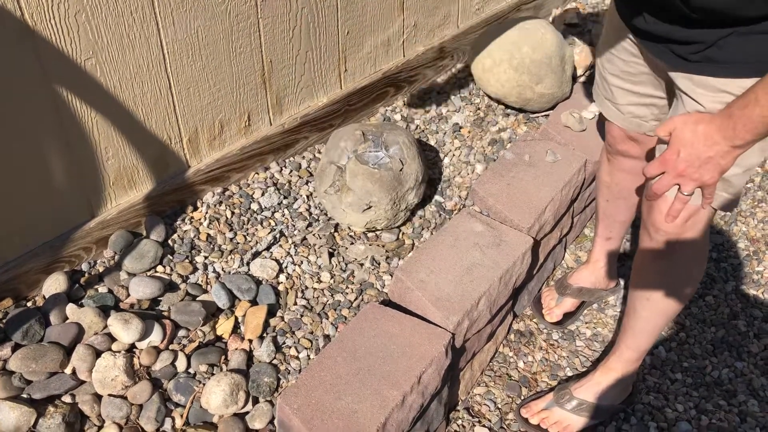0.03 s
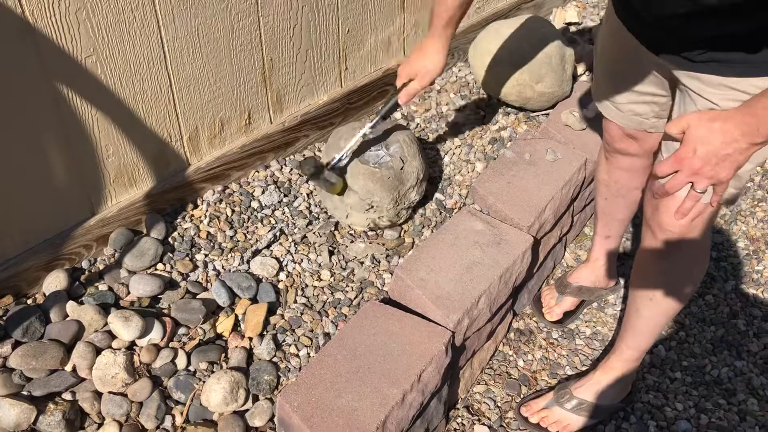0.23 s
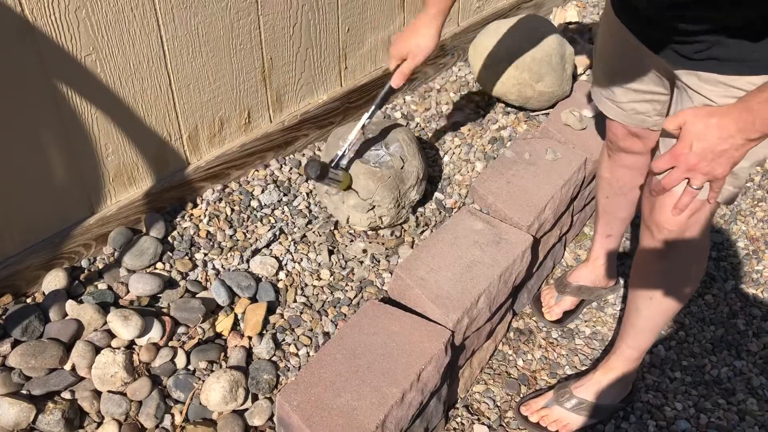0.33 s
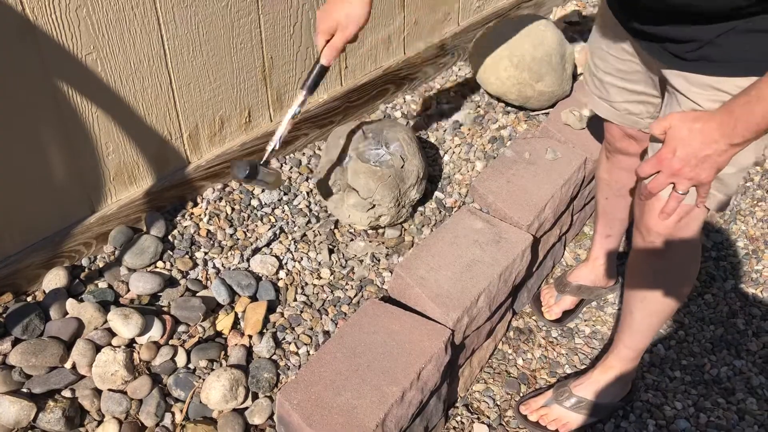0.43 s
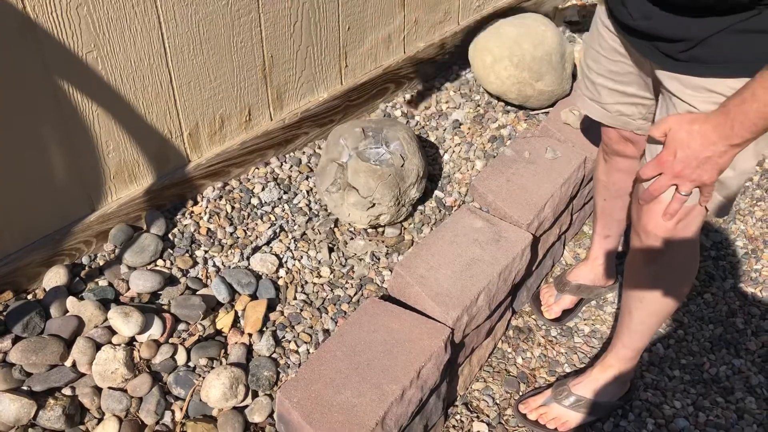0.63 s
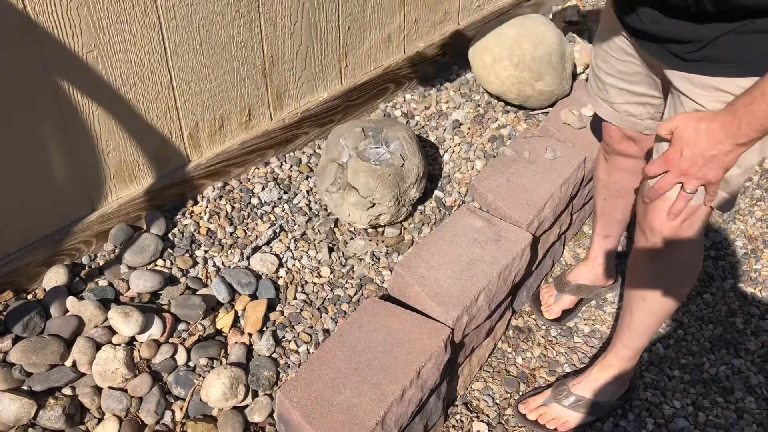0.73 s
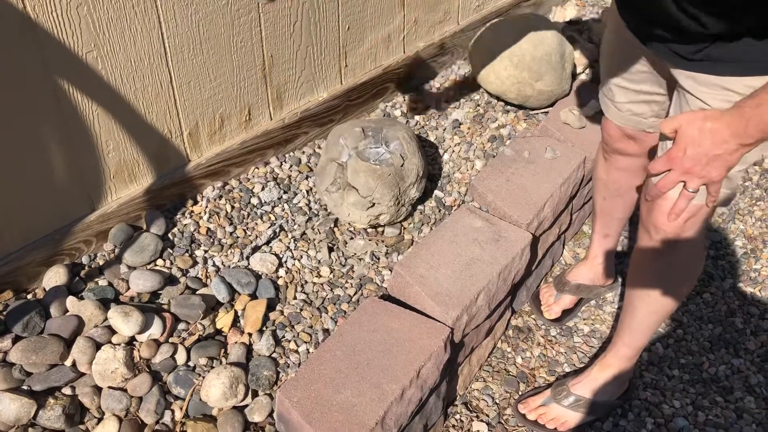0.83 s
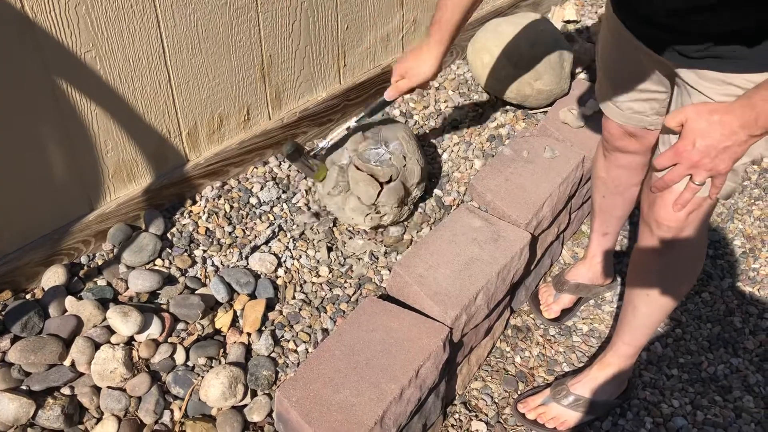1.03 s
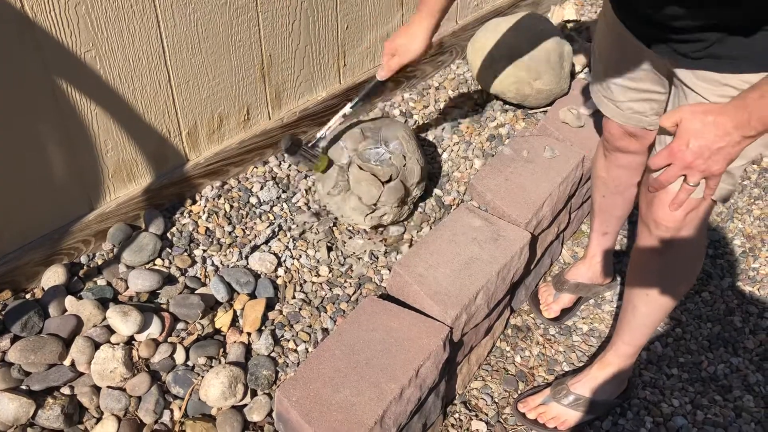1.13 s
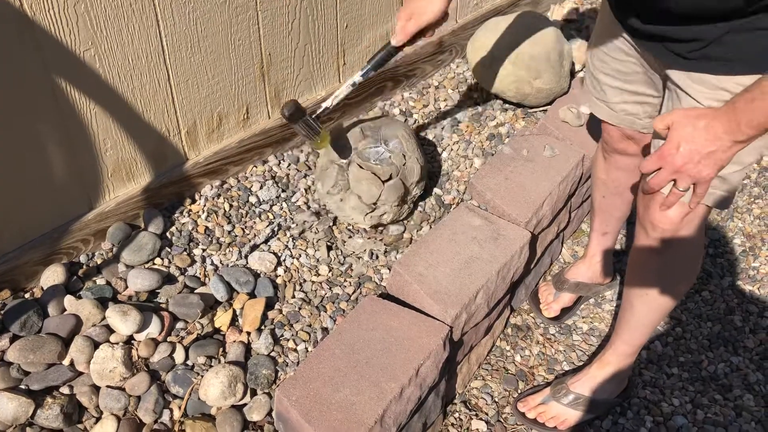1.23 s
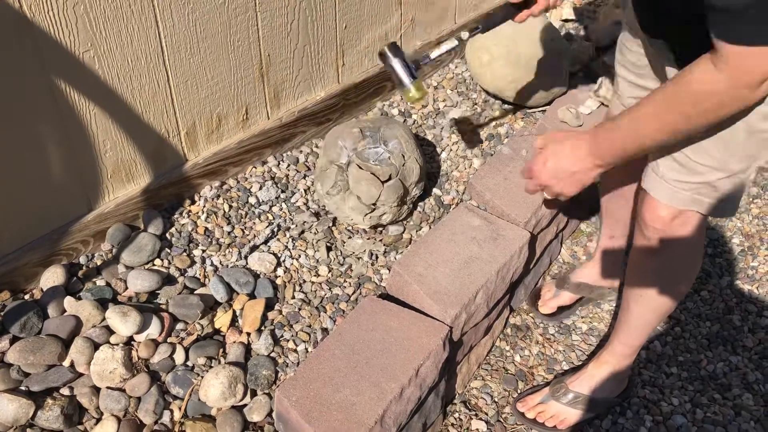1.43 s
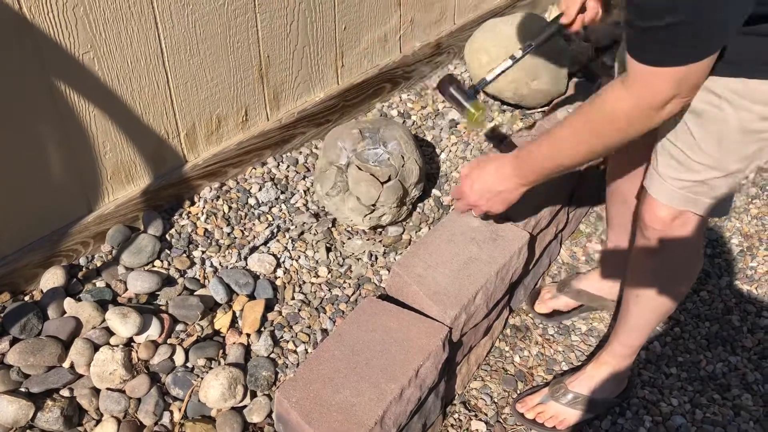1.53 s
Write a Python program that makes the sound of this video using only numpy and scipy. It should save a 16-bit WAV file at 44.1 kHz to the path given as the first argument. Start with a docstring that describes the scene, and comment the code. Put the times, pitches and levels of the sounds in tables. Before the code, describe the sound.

A hammer strikes a rock at about 0.2 seconds, a sharp crack with a brief stony ring, a dull thud and a short outdoor echo. Chips click onto gravel until 0.6 seconds. A second, slightly softer blow lands at about 0.95 seconds, spraying grit and small ticking fragments. From around 1.4 seconds a foot scrapes softly on the gravel. Quiet outdoor air lies underneath.

```python
"""Hammer on rock

A hammer strikes a rock twice in a gravel bed beside a wall. Each blow cracks, rings the stone briefly
and drives it into the ground with a thud; the yard answers and chips patter down. At the end a foot
shifts on the gravel. Quiet outdoor air lies underneath, with soft low bumps and faint tones."""
import sys
import numpy as np
from scipy import signal
from scipy.fft import rfft, irfft
from scipy.io import wavfile
from scipy.ndimage import uniform_filter1d

SR = 44100
rng = np.random.default_rng(int(sys.argv[2]) if len(sys.argv) > 2 else 0)


def dump(signal):
    """Clip the signal to [-1, 1] and save it as 16-bit WAV at the path in sys.argv[1]."""
    limited = np.clip(np.atleast_2d(signal).T, -1, 1)
    pcm = np.round(limited * 32767).astype(np.int16)
    wavfile.write(sys.argv[1], SR, pcm)


N = 70560
T = np.arange(N) / SR
HZ = np.fft.rfftfreq(N, 1 / SR)
SHORT = 4096  # samples in a brief event
GRIT_HZ, YARD_RISE_S = 8000, 0.0042


def amp(db):
    """Decibels to gain."""
    return 10 ** (np.asarray(db) / 20)


def unit(x):
    """Scale to rms 1."""
    return x / np.sqrt(np.mean(x ** 2) + 1e-20)


def noise(gain):
    """Noise of rms 1 with the given gain at each frequency."""
    return unit(irfft(gain * (rng.standard_normal(len(gain)) + 1j * rng.standard_normal(len(gain)))))


def colour(points):
    """An EQ curve through (Hz, dB) points on a log frequency axis."""
    hz, db = np.transpose(points)
    return amp(np.interp(np.log(HZ + 1), np.log(hz), db))


def band(hz, octaves, size=N):
    """The EQ curve of a broad resonance."""
    octaves_away = np.log2((np.fft.rfftfreq(size, 1 / SR) + 1) / hz)
    return 1 / (1 + (octaves_away / octaves) ** 2) ** 1.5


def fade(rise_s, t60_s, size=N):
    """Quick attack, exponential decay."""
    return (1 - np.exp(-T[:size] / rise_s)) * np.exp(-np.log(1000) * T[:size] / t60_s)


def at(s, x):
    """Place x at s seconds in a full-length track."""
    return np.pad(x, (max(round(s * SR), 0), N - len(x)))[:N]


def swell(s, db, hz, width_s, glide=0):
    """A slightly wavering tone that swells and fades in a bell curve around s."""
    t = T - s
    knots = T[::SR // 100]
    waver = 0.7 * np.sqrt(hz / 2000) * np.interp(T, knots, rng.standard_normal(len(knots)))
    envelope = np.exp(-np.minimum((t / width_s) ** 2, 60) / 2)
    return amp(db) * envelope * np.cos(2 * np.pi * (hz * t + glide * t ** 2 / 2) + waver)


def background():
    """Quiet outdoor air with soft low bumps and a few faint tones."""
    # The air's dark colour. Each row: frequency in Hz, level in dB.
    air_eq = [(15, -36), (25, -5), (66, -3.5), (122, -4), (227, -3.5), (313, -10.5), (349, -15),
              (495, -14.5), (648, -19), (997, -19), (1240, -21), (1380, -21), (1620, -25), (1850, -23),
              (2170, -27), (2770, -22.5), (3000, -23), (3630, -21.5), (4150, -26.5), (6210, -23.5),
              (7300, -28.5), (11200, -37), (15500, -38.5)]
    # The air's slow rise. Each row: time in seconds, level in dB.
    air_levels = [(0, -62), (.5, -60.5), (.8, -59.5), (1.15, -57), (1.27, -58.5), (1.6, -56)]
    # Low bumps. Each row: peak time in seconds, level in dB, pitch in Hz, half length in seconds.
    bumps = [(0.09, -50.5, 80, 0.0043), (0.387, -48.5, 62, 0.028), (0.759, -46.5, 72.4, 0.0052),
             (.862, -45, 106, 0.0097), (1.208, -51, 72.5, 0.013), (1.303, -40, 60, 0.0089),
             (1.388, -55, 99, 0.0081), (1.493, -50.5, 77.4, 0.025)]
    # Faint tones. Each row: as for a bump, then glide in Hz per second.
    tones = [(1.19, -63, 5110, .08, 100), (.65, -58, 235, .02, 0), (1.16, -55, 240, .03, 0),
             (1.348, -52, 280, .02, 1500), (.75, -76, 5100, .3, 0), (1.365, -68, 2310, .035, 500),
             (1.37, -69, 1490, .03, 1000)]
    air = amp(np.interp(T, *np.transpose(air_levels))) * noise(colour(air_eq))
    return air + sum(swell(*bump) for bump in bumps) + sum(swell(*tone) for tone in tones)


def chips():
    """Each fragment clicks on the gravel and leaves a faint tail in the yard."""
    # Chips and pebbles landing. Each row: start in seconds, level in dB, pitch in Hz,
    # width in octaves, t60 in seconds.
    landings = [(0.214, -30.5, 2780, 0.78, 0.0027), (0.3086, -20.5, 2080, 0.4, .016),
                (.3080, -29, 4500, 0.72, 0.016), (0.351, -33, 7050, 0.73, 0.012),
                (0.3533, -25.5, 5100, 0.86, 0.0067), (.3742, -36, 12000, 0.65, .008),
                (0.3768, -29.5, 8700, 0.75, 0.013), (0.3854, -28.5, 11000, 1.4, 0.009),
                (0.403, -39, 9500, 1.9, 0.014), (0.4123, -37, 12000, 0.59, 0.0095),
                (.4335, -45.5, 4930, 1.5, 0.011), (0.438, -34.5, 8200, 3, 0.0089),
                (.4675, -48, 10000, 1.3, 0.0071), (.5655, -33, 11100, 1.75, 0.01),
                (0.608, -57, 11000, 0.86, 0.0092), (0.905, -51, 4900, 1.3, 0.013),
                (1.0064, -29, 10600, 0.61, 0.0094), (1.0261, -24, 8240, 0.93, 0.0056),
                (1.0363, -26.5, 10200, 0.28, 0.0062), (1.045, -35, 5000, 1.8, 0.031),
                (1.0500, -34, 5000, 0.82, 0.02), (1.0514, -34, 1190, 0.53, 0.026),
                (1.1541, -39.5, 8860, 1.5, 0.014), (1.271, -53, 906, 0.73, 0.018),
                (1.415, -44.5, 6000, 1.3, 0.043), (1.435, -39, 6900, 1, 0.032),
                (1.4395, -38.5, 7000, .9, 0.075), (1.4350, -74, 810, .5, 0.06),
                (1.4833, -40, 6200, 1.5, 0.016), (1.5593, -30, 11300, 1.1, 0.013)]
    tail = amp(-24) * fade(YARD_RISE_S, t60_s=0.092, size=SHORT)
    out = np.zeros(N)
    for s, db, hz, octaves, t60_s in landings:
        click = fade(0.00048, t60_s, SHORT)
        out += at(s, amp(db) * (click + tail) * noise(band(hz, octaves, SHORT)))
    return out


def snap(gain):
    """Steel meets stone in one sharp pulse, treble first: the lows take longer to build."""
    build_cycles, lag_s = 1.4, 0.0002
    turns = build_cycles * np.log(HZ + 1) + lag_s * HZ
    pulse = irfft(gain * np.exp(-2j * np.pi * turns))[:SHORT]
    return at(0, pulse / np.abs(signal.hilbert(pulse)).max())


def ring(modes, rise_s):
    """Damped modes of alternating polarity, their balance a little different at every blow."""
    out = np.zeros(SHORT)
    for k, (hz, db, t60_s) in enumerate(modes):
        gain = (-1) ** k * amp(db + rng.normal(0, 1))
        out += gain * fade(rise_s, t60_s, SHORT) * np.sin(2 * np.pi * hz * T[:SHORT])
    return at(0, out)


def grains(per_s, hz):
    """Loose grit: sparse tiny ticks of uneven size, rms 1."""
    impacts = (rng.random(N) < per_s / SR) * rng.standard_normal(N)
    tick = noise(band(hz, octaves=0.78, size=SHORT)) * fade(0.0001, t60_s=0.0035, size=SHORT)
    return unit(signal.oaconvolve(impacts, tick)[:N])


def hammer():
    """The struck rock cracks, rings and thuds into the gravel; the yard answers and grit sprays."""
    # The blows. Each row: start in seconds, snap level in dB, snap pitch in Hz, crack, ring and knock
    # levels in dB, thud delay in seconds, then thud, ground, yard and grit levels in dB.
    blows = [(0.2359, -1.5, 3554, -12, -24, -18, .0108, -16, -31.5, -35.5, -54.5),
             (0.9455, -4, 2980, -17.5, -24, -21, .0112, -20, -38.5, -33, -32.5)]
    # Colour of the contact, one curve per blow. Each point: frequency in Hz, level in dB.
    contact_eqs = [
        [(250, -6), (600, -3), (1000, 1.5), (1800, -7), (2500, 1), (4100, -2.5), (5000, -7), (6300, -10),
         (10000, -12), (15500, -21)],
        [(250, -36), (600, 4.5), (1000, 0), (1400, -9), (2200, -2), (3200, -1), (4300, -12.5), (6000, -1.5),
         (9000, -5.5), (15500, -11)],
    ]
    # The rock's bright ring. Each row: pitch in Hz, relative level in dB, t60 in seconds.
    rock_modes = [(1488, -3, 0.027), (1899, -6.5, 0.053), (2135, -1, .05), (2428, -8, 0.065),
                  (2740, -3, 0.034), (2944, -17, 0.028), (3105, -4.5, .05), (3357, -8, 0.066),
                  (4060, -5, 0.0204), (4400, -9, 0.053), (5250, -13.5, .04), (6140, -4, .05),
                  (7050, -9.5, 0.042)]
    # Dull knock of the hammer head and the rock's bulk. Rows as for the ring.
    knock_modes = [(525, 4.5, 0.015), (662, 6.5, 0.018), (796, 3, 0.025), (1076, 1, 0.0088)]
    # The rock bedding into the ground. Rows as for the ring.
    thud_modes = [(85, -12, 0.13), (169, 1.5, 0.027), (293, 0, 0.017), (502, -3, 0.015), (702, 1.5, .028)]
    # The ground's rumble. Each row: frequency in Hz, level in dB.
    ground_eq = [(25, -28), (55, -11.5), (80, 0.5), (110, -7), (165, 0.5), (240, -9), (400, -16.5),
                 (900, -50)]
    # Colour of the yard's reverb and the crushed gravel. Each row: frequency in Hz, level in dB.
    yard_eq = [(120, -41.5), (200, -11), (515, -3), (974, -6), (1280, -8.5), (2560, -12.5), (3010, -11.5),
               (3300, -12.5), (7620, -17.5), (11000, -22), (15500, -26.5)]
    # The rock's modes linger in the reverb as peaks of 35 Hz half width.
    lingering = 1 + amp(-8.5) * sum(1 / (1 + ((HZ - hz) / 35) ** 2) for hz, _, _ in rock_modes)
    late_damping = np.exp(-np.log(1000) * np.maximum(T - 0.056, 0) / 0.9)  # steepens the tail
    yard_envelope = fade(YARD_RISE_S, 0.45) * late_damping
    radiate = signal.butter(2, 380, "highpass", fs=SR, output="sos")  # too small a rock to radiate bass
    out = np.zeros(N)
    for blow, contact_eq in zip(blows, contact_eqs):
        s, snap_db, snap_hz, crack_db, ring_db, knock_db = blow[:6]
        thud_delay_s, thud_db, ground_db, yard_db, grit_db = blow[6:]
        contact = colour(contact_eq)
        pulse = amp(snap_db) * snap(contact * band(snap_hz, octaves=1.46))
        crack = amp(crack_db) * fade(0.00013, t60_s=0.025) * noise(contact)
        stone = amp(ring_db) * ring(rock_modes, rise_s=0.00078)
        knock = amp(knock_db) * at(0.001123, ring(knock_modes, rise_s=0.0002))
        strike = signal.sosfilt(radiate, pulse + crack + stone + knock)
        crunch = amp(-12) * fade(0.00017, t60_s=0.042) * noise(colour(yard_eq))
        thud = amp(thud_db) * (ring(thud_modes, rise_s=0.00017) + crunch)
        ground = amp(ground_db) * fade(YARD_RISE_S, t60_s=0.37) * noise(colour(ground_eq))
        yard = amp(yard_db) * yard_envelope * noise(colour(yard_eq) * lingering)
        spray = amp(grit_db) * fade(0.037, t60_s=0.2) * grains(per_s=506, hz=GRIT_HZ)
        trickle = amp(-52.5) * fade(0.037, t60_s=0.73) * grains(per_s=250, hz=11500)
        out += at(s, strike + yard + spray + trickle + at(thud_delay_s, thud + ground))
    return out


def foot():
    """A sole scrapes over the gravel, with a rough gritty hiss on top."""
    # The foot's move. Each row: time in seconds, relative grit and scrape levels in dB.
    scuff = [(1.3, -70, -73), (1.304, -64, -77), (1.328, -68, -50.5), (1.394, -60.5, -67),
             (1.444, -50.5, -43), (1.46, -56.5, -59.5), (1.518, -46.5, -49.5), (1.53, -47.5, -41.5),
             (1.6, -53.5, -47)]
    # The bright hiss of grit. Each row: frequency in Hz, level in dB.
    grit_eq = [(1060, -6.5), (1800, -13.5), (2510, 2.5), (2720, -1.5), (4590, 1), (11000, -7.5),
               (12800, -10), (15500, -10.5)]
    # The dull body of the scrape. Each row: frequency in Hz, level in dB.
    scrape_eq = [(120, -38), (200, -14), (267, -6.5), (420, -8.5), (471, -1.5), (816, -9.5), (882, -1),
                 (1170, -7), (2000, -19), (2600, -53), (4400, -120)]
    times, grit_db, scrape_db = np.transpose(scuff)
    fade_in = np.clip((T - times[0]) / 0.13, 0, 1)
    crackle = amp(-6) * grains(per_s=320, hz=GRIT_HZ)
    roughness_db = 3 * unit(uniform_filter1d(rng.standard_normal(N), size=70))
    hiss = amp(roughness_db) * noise(colour(grit_eq))
    grit = amp(np.interp(T, times, grit_db) + 2.5) * unit(hiss + crackle)
    scrape = amp(np.interp(T, times, scrape_db) - 2) * noise(colour(scrape_eq))
    return fade_in * (grit + scrape)


def scene():
    """All sources at one microphone."""
    return (hammer() + chips() + foot() + background())[None]


def record(dry):
    """The recorder drops the deepest bass, rounds off the highest peaks and cuts the extreme treble."""
    low_cut_hz, top_hz, ceiling = 19, 15900, 1.2
    thinned = signal.sosfilt(signal.butter(2, low_cut_hz, "highpass", fs=SR, output="sos"), dry)
    rounded = thinned / (1 + np.abs(thinned / ceiling) ** 6) ** (1 / 6)
    high_cut = 1 / (1 + (np.fft.rfftfreq(2 * N, 1 / SR) / top_hz) ** 200)
    return irfft(rfft(rounded, 2 * N) * high_cut)[:, :N]


dry = scene()
out = record(dry)
dump(out)
```